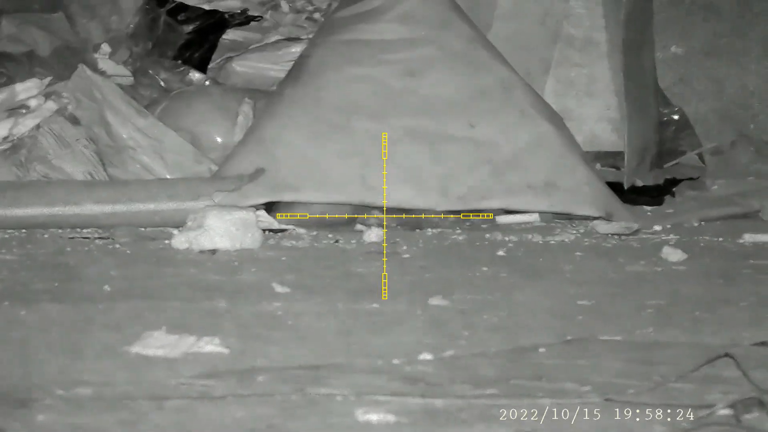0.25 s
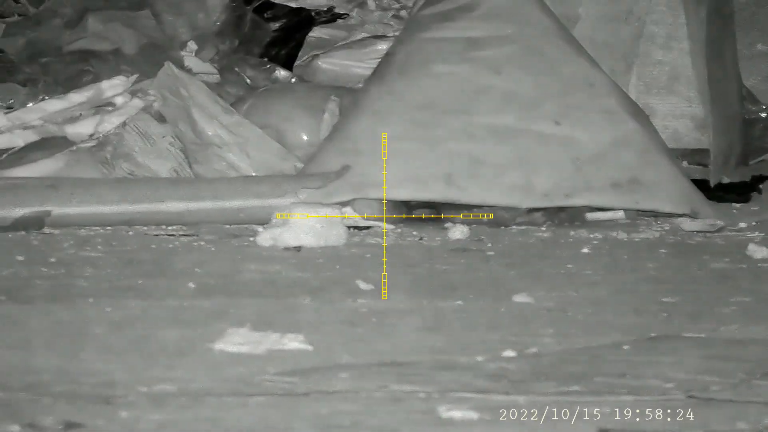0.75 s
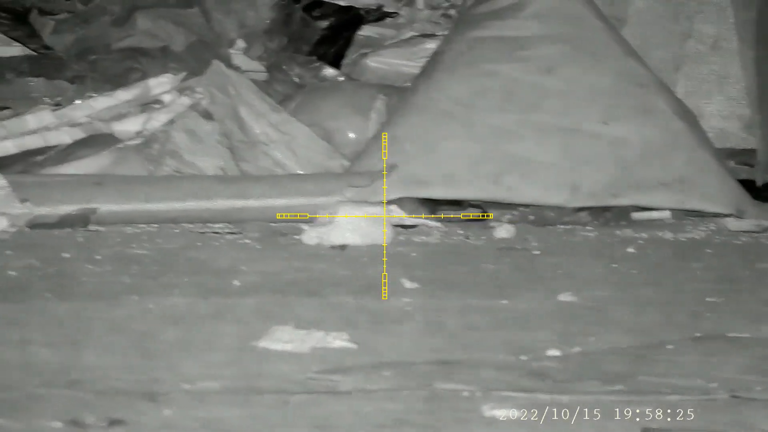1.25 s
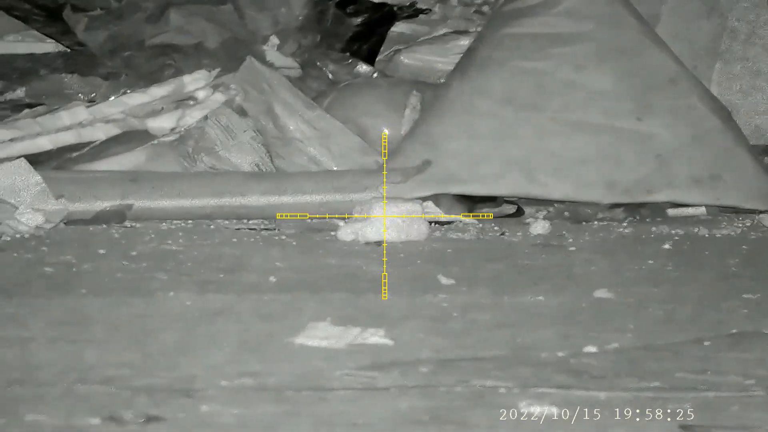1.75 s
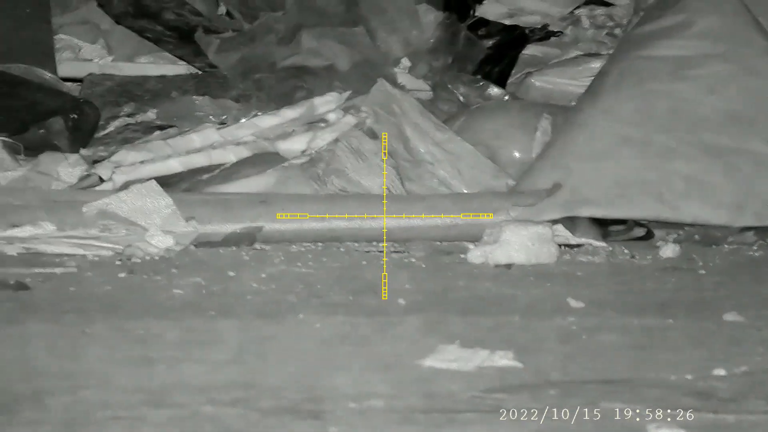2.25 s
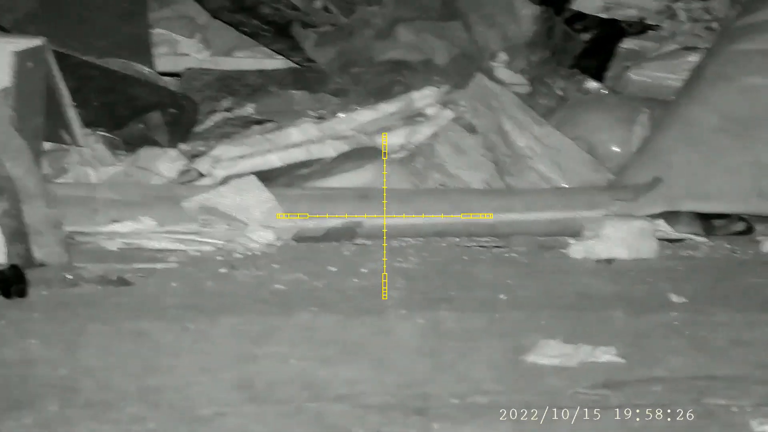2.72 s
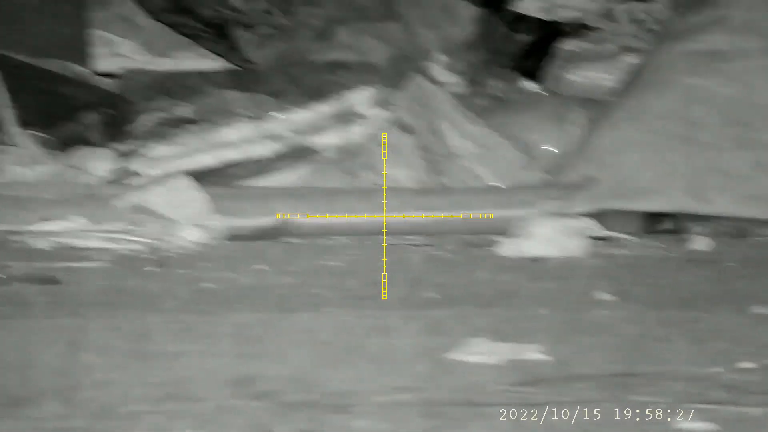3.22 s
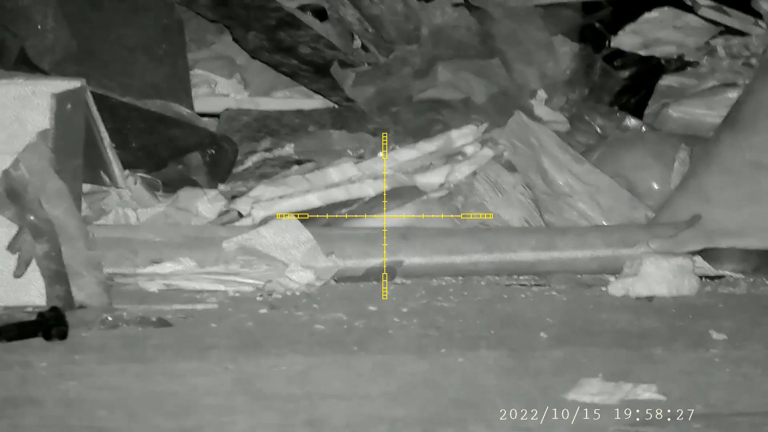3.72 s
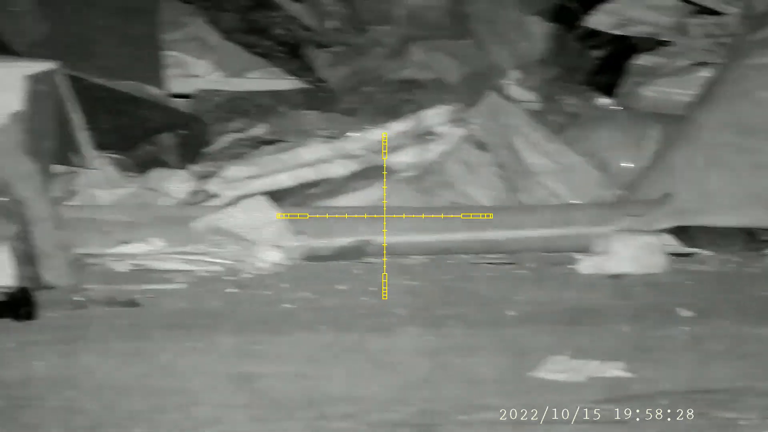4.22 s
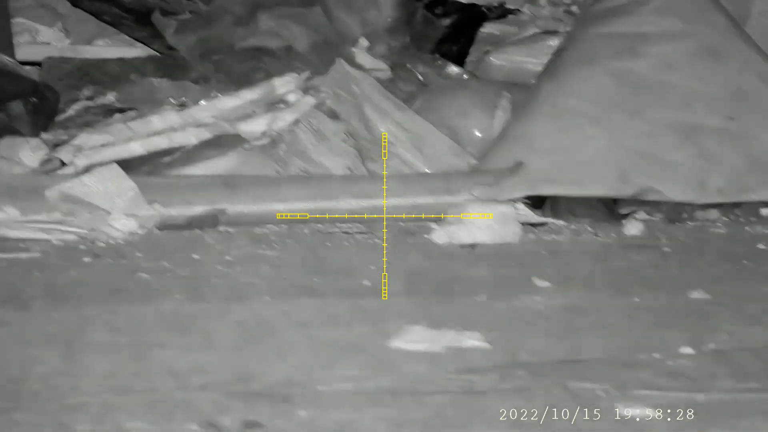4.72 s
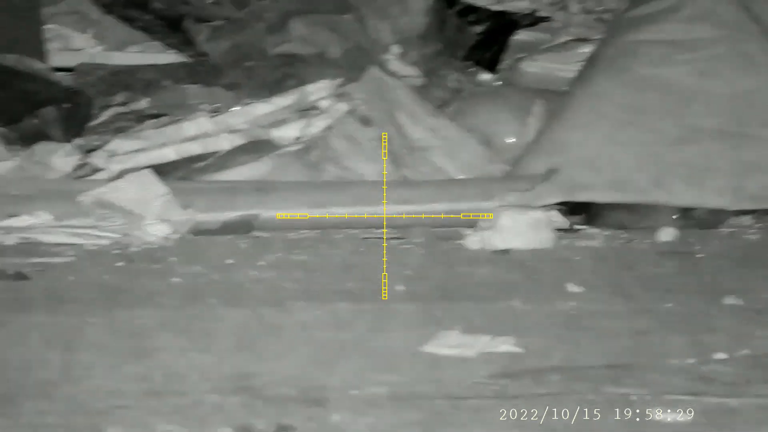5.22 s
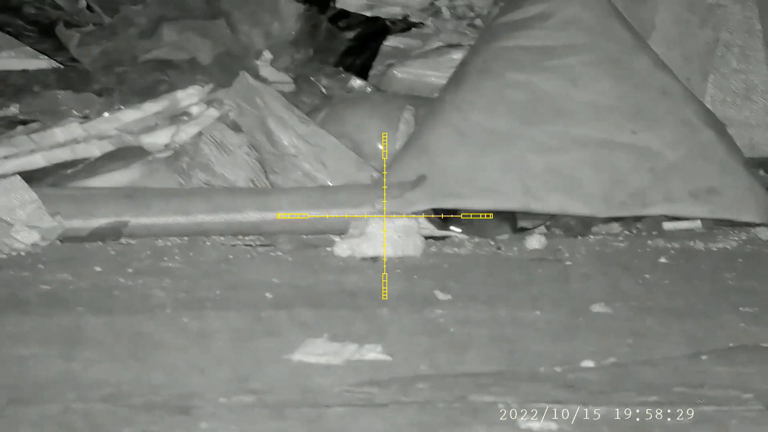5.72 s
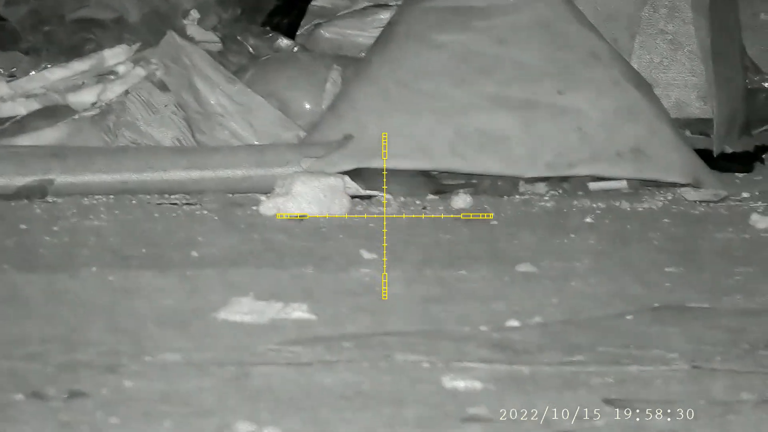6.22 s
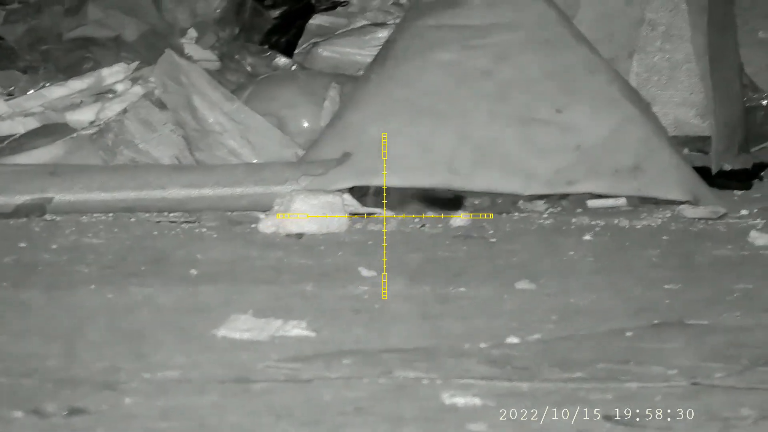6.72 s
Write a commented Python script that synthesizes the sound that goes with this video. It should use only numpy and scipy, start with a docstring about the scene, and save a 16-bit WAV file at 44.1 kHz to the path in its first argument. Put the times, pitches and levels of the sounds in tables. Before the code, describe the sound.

An air rifle cracks and thumps at once with a metallic spring ring, then hands work its action in hard steel clacks and clicks.

```python
"""In a yard, heard from a night scope on an air rifle: the rifle fires, then its action is worked by hand.
Shot: chattering steel contacts and a noise blast for piston and air, decaying sines for the ringing spring.
Handling: filtered contact bursts, ringing breech modes, pressure pulses on the stock, rubbing noise.
The yard answers with soft noise tails; the scope adds hiss, fizz and whine.
The scope's limiter ducks under the shot and recovers; overload clips, and the band is cut at the top."""
import sys
import numpy as np
from scipy.fft import rfft, irfft, next_fast_len
from scipy.io import wavfile
from scipy.ndimage import uniform_filter1d, minimum_filter1d

SR = 44100
rng = np.random.default_rng(int(sys.argv[2]) if len(sys.argv) > 2 else 0)


def to_wav(sig):
    """Store sig (one row per channel, or 1-D mono) as 16-bit WAV at the path in sys.argv[1].

    Samples outside -1..1 are clipped; the rate is SR.
    """
    pcm = np.clip(np.atleast_2d(sig), -1, 1) * 32767
    pcm = np.round(pcm).astype(np.int16)
    wavfile.write(sys.argv[1], SR, pcm.T)  # frames by channels


N = 306803
T = np.arange(N) / SR


def amp(db):
    """Decibels to gain."""
    return 10 ** (np.asarray(db) / 20)


def unit(x):
    """Scale to rms 1."""
    return x / np.sqrt(np.mean(x ** 2) + 1e-20)


def along(points, hz):
    """(Hz, value) points read on a log axis."""
    point_hz, value = np.transpose(points)
    return np.interp(np.log(hz + 1), np.log(point_hz), value)


def add(track, start_s, sound):
    """Mix a sound into the track; a start before zero becomes zero."""
    i = max(round(start_s * SR), 0)
    track[i:i + len(sound)] += sound[:N - i]


def filtered(x, gain):
    """x times a gain that depends on frequency."""
    size = next_fast_len(len(x) + 8192)
    spectrum = rfft(x, size) * gain(np.fft.rfftfreq(size, 1 / SR))
    return irfft(spectrum, size)[:len(x)]


def noise(gain):
    """Coloured noise of rms 1."""
    return unit(filtered(rng.standard_normal(N), gain))


def causal(gain):
    """Minimum-phase response with this magnitude: it rings only after the blow."""
    cepstrum = irfft(np.log(gain + 1e-6))
    half = len(cepstrum) // 2
    cepstrum[1:half] *= 2
    cepstrum[half + 1:] = 0
    return np.exp(rfft(cepstrum))


def peak(f, centre_hz, width_hz):
    """Power response of one resonance."""
    return 1 / (1 + (2 * (f - centre_hz) / width_hz) ** 2)


def grain(t, rate_hz, depth_db):
    """Gain that wanders at random between rate_hz new levels a second."""
    knots = rng.standard_normal(4096)
    return amp(depth_db * np.interp(t * rate_hz, np.arange(len(knots)), knots))


def swell(start_s, hold_s, rise_s, t60_s):
    """Envelope that rises to 1 at start_s, holds and dies away."""
    rise = np.exp(np.minimum(T - start_s, 0) / rise_s)
    return rise * amp(-60 * np.maximum(T - start_s - hold_s, 0) / t60_s)


# spectrum of the background air, relative: (point_hz, density_db)
AIR_SPECTRUM = [(20, -2), (60, 0), (250, -0.5), (500, -4), (1000, -8.5), (2000, -14.5), (3200, -19),
                (8700, -21), (12500, -23), (15300, -27), (15700, -52.5)]
# electronic whine: (harmonic_number, rms_db)
WHINE_LINES = [(2, -78), (3, -76), (4, -73.5), (5, -76.5), (6, -76.5), (7, -71), (8, -84), (9, -87),
               (10, -69.5), (12, -89), (13, -88.5), (14, -89.5)]
# narrow bands of electronic fizz, relative: (centre_hz, width_hz, gain_db)
FIZZ_BANDS = [(9480, 260, -5), (10330, 300, -5)]
HISS_DB = -58  # rms, fizz included


def electronics(whine_hz=1001):
    """Steady hiss, two bands of fizz and a comb of thin whining lines."""
    whine = 0
    for harmonic, rms_db in WHINE_LINES:
        phase = 2 * np.pi * (round(harmonic) * whine_hz * T + rng.random())
        whine = whine + amp(rms_db) * np.sqrt(2) * np.sin(phase)

    def colour(f):
        fizz = sum(amp(db) * np.exp(-2 * ((f - hz) / width_hz) ** 2) for hz, width_hz, db in FIZZ_BANDS)
        return np.hypot(amp(along(AIR_SPECTRUM, f)), fizz)

    return whine + amp(HISS_DB) * noise(colour)


# yard's answers to the loudest blows: (start_s, level_db)
YARD_ECHOES = [(0, -47.5), (2.37, -55), (4.449, -51.5)]
ECHO_RISE_S, ECHO_T60_S = 0.049, 1.9


def yard(hold_s=0.035):
    """Diffuse reflections: a soft, dull noise wash for the loudest blows."""
    tilt = [(100, -3), (350, -1), (1500, -1.5), (5000, -1.5), (12000, -4.5)]  # (Hz, dB)
    wash = noise(lambda f: amp(along(AIR_SPECTRUM, f) + along(tilt, f)))
    return wash * sum(amp(db) * swell(s, hold_s, ECHO_RISE_S, ECHO_T60_S) for s, db in YARD_ECHOES)


# resonances of action and scope mount, relative: (centre_hz, width_hz, gain_db)
BODY_RESONANCES = [(204, 32, -9.5), (474, 90, -18), (1060, 120, -11), (1422, 160, -6.5), (1994, 160, -2),
                   (2640, 150, -12.5), (3007, 130, -4), (3560, 170, -3.5), (4140, 160, 2), (4745, 130, -17),
                   (5390, 86, -8.5), (6300, 200, -2.5), (6930, 1000, -13), (8670, 710, -11.5)]


def body(f, between_db=-23):
    """Gain from the action through the mount to the microphone: resonances over a floor."""
    power = sum(amp(db) ** 2 * peak(f, hz, width_hz) for hz, width_hz, db in BODY_RESONANCES)
    return np.sqrt(power + amp(between_db) ** 2)


# hands and parts slide: (start_s, length_s, level_db)
SLIDE_STROKES = [(1.92, 0.038, -61.5), (2.32, .06, -42), (2.545, .1, -53), (3.22, 0.083, -50),
                 (3.55, .05, -61.5), (3.9, .06, -55.5), (4.39, .04, -47), (4.52, 0.1265, -55.5)]
# faint thin squeaks: (start_s, length_s, level_db)
THIN_SQUEAKS = [(0.47, 0.039, -53), (3.115, 0.035, -63), (3.708, 0.07, -57), (4.865, 0.12, -55.5),
                (5.346, 0.042, -62), (6.06, 0.1, -62), (6.555, 0.055, -62.5)]
STROKE_RISE_S, STROKE_T60_S = 0.029, 0.4
GRIP_FROM_S, GRIP_TO_S, GRIP_DB = 2, 5.0, -67.5  # the hands rub faintly while they work the gun


def sliding(squeak_hz=4065, squeak_width_hz=87):
    """Uneven rubbing noise sounds through the action in strokes; squeaks are a narrow noise band."""
    tilt = [(300, 5), (2000, 0), (4000, -10), (9000, -6)]  # (Hz, dB)
    rub = noise(lambda f: body(f) * amp(along(tilt, f)))
    strokes = [*SLIDE_STROKES, (GRIP_FROM_S, GRIP_TO_S - GRIP_FROM_S, GRIP_DB)]
    power = sum((amp(db) * swell(s, length_s, STROKE_RISE_S, STROKE_T60_S)) ** 2
                for s, length_s, db in strokes)
    out = np.sqrt(power) * unit(rub * grain(T, rate_hz=200, depth_db=2.0))
    tone = noise(lambda f: peak(f, squeak_hz, squeak_width_hz))
    for start_s, length_s, db in THIN_SQUEAKS:
        arch = np.sin(np.pi * np.clip((T - start_s) / length_s, 0, 1))
        out += amp(db) * tone * np.sqrt(np.abs(arch))
    return out


# the stock is pushed and lets go: (release_s, peak_db, build_s)
STOCK_BUMPS = [(.010, 14, 0.0032), (.043, 1, 0.0042), (.079, -12, .0051), (0.199, -32.5, 0.0054),
               (1.928, -24, .0011), (2.205, -22.5, 0.0032), (2.221, -17.5, 0.0021), (2.261, -22, 0.0055),
               (2.277, -20.5, 0.0033), (2.378, -17, 0.0033), (2.413, -14.5, 0.0022), (2.574, -23, .0071),
               (3.252, -20.5, .0043), (3.374, -34.5, 0.0047), (3.711, -33.5, .005), (3.909, -16.5, 0.0017),
               (4.052, -37, 0.0056), (4.384, -17, 0.0019), (4.426, -17, 0.0021), (4.521, -26.5, 0.0068),
               (4.616, -28, 0.0049), (4.687, -31, 0.0088), (4.89, -25, 0.0058)]
# the whole gun shakes in the hands: (start_s, start_level_db, pitch_hz, length_s, t60_s)
GUN_SHAKES = [(0, 9.5, 30.3, 0.097, 0.61), (0.083, -7.5, 42.6, 0.099, 0.24), (0.14, -14.5, 37.1, 0.056, .8),
              (4.388, -10, 46.3, .09, .14), (4.473, -19, 30, 0.054, 2), (4.531, -32.5, 28, .17, 1.2)]
# a heavy bump rebounds once, less after a slow build-up
REBOUND_S, REBOUND_DB, REBOUND_LOSS_DB_PER_S, HEAVY_BUMP_DB = .013, -4.5, 1201, -17


def stock(snap_s=0.00076, lead_s=0.036):
    """Pressure builds on the stock, flips as it lets go and rebounds; big jolts leave the gun shaking."""
    out = np.zeros(N)
    t = np.arange(-round(lead_s * SR), round(lead_s * SR)) / SR
    rebounds = [(s + REBOUND_S, db + REBOUND_DB - REBOUND_LOSS_DB_PER_S * build_s, build_s)
                for s, db, build_s in STOCK_BUMPS if db > HEAVY_BUMP_DB]
    for release_s, peak_db, build_s in list(STOCK_BUMPS) + rebounds:
        u = t / build_s
        before = (1 - (u / 2) ** 2) * np.exp(-(u / 2) ** 2)
        after = np.exp(-np.abs(u) * 0.63)
        push = -np.tanh(t / snap_s) * np.where(t < 0, before, after)
        push = push[max(round((lead_s - release_s) * SR), 0):]  # trim what precedes time zero
        add(out, release_s - lead_s, amp(peak_db) * push / np.abs(push).max())
    for start_s, db, pitch_hz, length_s, t60_s in GUN_SHAKES:
        age = T[:round(length_s * SR)]
        grip = 1 - (age / length_s) ** 6
        envelope = amp(db - 60 * age / t60_s) * grip ** 2 * np.minimum(age / 0.0031, 1)
        add(out, start_s, envelope * np.sin(2 * np.pi * pitch_hz * age))
    return out


FAVOUR_DB, FAVOUR_OCTAVES = 6, 0.35  # lift around a contact's strongest ring
DULLING = .25  # dB more knock and clack per dB lighter contact


def contacts(rows, release_s, rattle_db, rattle_t60_s, knock_db, clack_db, attack_s=0.00039, size=8192):
    """Steel parts chatter for milliseconds and drive the action; one ring is favoured, light hits are duller.

    rows: (start_s, level_db, contact_s, ring_hz, ping_db, sizzle_db)"""
    out = np.zeros(N)
    t, f = np.arange(size) / SR, np.fft.rfftfreq(size, 1 / SR)
    body_gain = body(f)
    for start_s, db, contact_s, ring_hz, ping_db, sizzle_db in rows:
        press = np.minimum(t / attack_s, 1) * amp(-60 * np.maximum(t - contact_s, 0) / release_s)
        rattle = amp(rattle_db - 60 * t / rattle_t60_s) * grain(t, rate_hz=400, depth_db=3.5)
        force = rfft(rng.standard_normal(size) * (press + rattle))
        # even out the random force, so each hit keeps its set colour
        force /= causal(np.sqrt(np.abs(uniform_filter1d(np.abs(force) ** 2, size=100))))
        knock = knock_db - DULLING * db
        clack = clack_db - DULLING * db
        colour = [(60, knock - 20), (220, knock), (500, knock + 3), (800, knock),
                  (1100, clack), (2400, clack), (3000, 0.0016), (4700, 0),
                  (5400, ping_db), (8400, ping_db),
                  (9100, sizzle_db), (13000, sizzle_db), (16000, sizzle_db - 14)]  # (Hz, dB)
        favour_db = FAVOUR_DB * np.exp(-(np.log2((f + 1) / ring_hz) / FAVOUR_OCTAVES) ** 2)
        ring = np.sqrt(1 + 3 * peak(f, ring_hz, 160))
        gain = body_gain * amp(along(colour, f) + favour_db) * ring
        hit = irfft(force * causal(gain))
        add(out, start_s, amp(db) * hit * np.sqrt((contact_s + 0.0018) * SR / np.sum(hit ** 2)))
    return out


LOOSE_DB, LOOSE_CONTACT_S, LOOSE_HZ = -26.5, .004, 1990  # level relative to the bump
LOOSE_PING_DB, LOOSE_SIZZLE_DB = -2, -4.5


def loose_part():
    """Every listed bump on the stock shakes a dull tick out of the action."""
    ticks = [(s, db + LOOSE_DB, LOOSE_CONTACT_S, LOOSE_HZ, LOOSE_PING_DB, LOOSE_SIZZLE_DB)
             for s, db, build_s in STOCK_BUMPS]
    return contacts(ticks, release_s=.014, rattle_db=-19.5, rattle_t60_s=.08, knock_db=1, clack_db=-7)


# contacts in the action: (start_s, level_db, contact_s, ring_hz, ping_db, sizzle_db)
ACTION_CONTACTS = [(0.4952, -38, 0.0019, 6780, 4.5, -26), (0.648, -34.5, 0.0056, 4250, -0.5, -34),
                   (1.7492, -36, 0.0019, 1415, -9.5, -39.5), (1.9191, -19.5, 0.001, 6300, -2, -6.5),
                   (2.1792, -12.5, 0.0013, 4150, 7, -25.5), (2.188, -27.5, 0.0028, 3850, -4, -20),
                   (2.2043, 0.5, 0.0054, 2200, 3.5, -6.5), (2.302, -12.5, 0.0037, 2150, 0, -18.5),
                   (2.313, -22, 0.0039, 1460, 3, -28), (2.3255, -24, 0.0026, 1980, 4, -35),
                   (2.3577, -14, 0.003, 5950, 1, -14), (2.3662, -4.5, 0.0065, 3570, 2.5, -16),
                   (2.406, 1.5, 0.0029, 1464, -1.5, -24), (2.547, -31.5, 0.0014, 2200, 11, -5),
                   (2.5648, -16.5, 0.0035, 2030, -5.5, -20), (2.603, -29.5, 0.0029, 1895, -9, -7),
                   (2.641, -41, 0.0028, 1450, -8, 3), (2.6818, -30, 0.0022, 1420, -5.5, -31),
                   (3.227, -24.5, .0046, 2030, 6, -30), (3.237, -18.5, .0033, 4350, 2, -35),
                   (3.249, -25.5, 0.005, 2170, -3, -38), (3.2625, -16, 0.0023, 2160, 1.5, -8),
                   (3.3177, -28, 0.0012, 1984, 2.5, 5.5), (3.693, -44, 0.0019, 1965, 3, -9),
                   (3.8976, -24.5, 0.0055, 6860, 2.5, -19.5), (3.904, -21.5, 0.0085, 1850, -5, -6.5),
                   (4.3685, -15.5, .002, 6190, -0.5, -24), (4.375, -9, 0.0031, 7070, 2, -17.5),
                   (4.3789, -6.5, 0.0054, 4140, 0, -9), (4.5218, -45, .003, 1950, -6, 3),
                   (4.548, -20, 0.0015, 6000, 4, -29), (4.943, -48.5, 0.028, 1890, -10, -9)]
# short modes of breech and lever, relative: (pitch_hz, level_db, t60_s)
BREECH_MODES = [(1445, -2, .14), (2194, -2, .12), (2545, -7, .12), (2947, -5, .12), (3558, 2, .2),
                (4541, -8, .14), (5214, -3, .14), (5643, -3, .14), (6280, -2, .2), (8659, -10, .12),
                (9004, -9, .15), (9335, -8, .12)]
# lever hits a stop, breech rings until a hand damps it; level relative: (start_s, level_db, ring_hz, free_s)
LEVER_STOPS = [(2.2044, -35, 2545, 0.038), (2.3665, -39, 3520, 0.039), (2.406, -37, 5214, 0.093),
               (2.531, -57, 4541, 0.02), (4.3788, -39.5, 6310, 0.12)]
LEAD_IN_S, LEAD_IN_DB, HEAVY_CLICK_DB = .004, -21, -12  # a faint lead-in tick before a heavy contact


def action(favour_db=10, damped_t60_s=.1, spread_db=4.06):
    """Steel contacts snap; hard stops ring the breech modes, each at random strength, until damped."""
    lead_ins = [(s - LEAD_IN_S, db + LEAD_IN_DB, *colour)
                for s, db, *colour in ACTION_CONTACTS if db > HEAVY_CLICK_DB]
    out = contacts([*ACTION_CONTACTS, *lead_ins], release_s=0.014, rattle_db=-18.0, rattle_t60_s=0.077,
                   knock_db=-4.0, clack_db=-1.5)
    t = T[:SR // 2]
    for start_s, db, ring_hz, free_s in LEVER_STOPS:
        hand = amp(-60 * np.maximum(t - free_s, 0) / damped_t60_s)
        for hz, mode_db, t60_s in BREECH_MODES:
            strength_db = db + mode_db + favour_db * peak(hz, ring_hz, 400) + rng.normal(0, spread_db)
            add(out, start_s, hand * amp(strength_db - 60 * t / t60_s) * np.sin(2 * np.pi * hz * t))
    return out


# piston slam and rebounds: (start_s, level_db, contact_s, ring_hz, ping_db, sizzle_db)
PISTON_BLOWS = [(0, 25.5, .0076, 3960, 4, 3), (.0144, 27, .0047, 4060, -3.5, 11.5),
                (.02, 24, .0005, 4080, 5, 7.5), (.03, 19.5, .0017, 4330, 5, 11),
                (.0375, 13.5, .0029, 3944, 4, 10.5)]
# long modes of spring and barrel, relative: (pitch_hz, level_db, t60_s)
SPRING_MODES = [(215, -24, .4), (318, -37, 1.0), (1187, -21, .4), (1841, -20, 1.05), (2700, -32, .4),
                (3563, 0, .3), (5125, -10, .35), (6282, -17, .42), (6985, -23, .4), (8479, -22, .35),
                (9577, -16, .35)]


def shot(ring_db=-8, blast_db=3, blast_t60_s=.17, echo_db=-32, echo_t60_s=0.68):
    """The piston slams and rebounds, air rushes from the muzzle, the spring rings on, the yard answers dully."""
    rush_colour = [(200, -4), (600, -1.0), (1400, 3.5), (2900, -4.0),
                   (4000, -6.0), (8000, 0), (12000, 3.5), (16000, -11.5)]  # (Hz, dB)
    rush = noise(lambda f: body(f, between_db=-9.5) * amp(along(rush_colour, f)))
    blast = rush * amp(blast_db - 60 * T / blast_t60_s) * grain(T, rate_hz=110, depth_db=5.5)
    slam = contacts(PISTON_BLOWS, release_s=.012, rattle_db=-16.5, rattle_t60_s=0.09,
                    knock_db=6.5, clack_db=8)
    spent = np.interp(T, [.066, .083], [1, 0])  # piston comes to rest, air runs out
    echo_colour = [(60, 8.5), (200, 0), (600, -7.0), (3000, -10.5), (11000, -14), (16000, -29.5)]  # (Hz, dB)
    echo = noise(lambda f: amp(along(echo_colour, f))) * amp(echo_db - 60 * T / echo_t60_s)
    spring = sum(amp(db - 60 * T / t60_s) * np.sin(2 * np.pi * hz * T) for hz, db, t60_s in SPRING_MODES)
    return (slam + blast) * spent + echo + amp(ring_db) * spring


def scene():
    """Sum of all sources as one channel, ahead of the scope's limiter."""
    background = electronics() + yard()
    handling = sliding() + stock() + loose_part() + action()
    return (background + handling + shot())[None]


def limiter(x, ceiling_db, recover_db_per_s, size=44):
    """Gain drops within about a millisecond around a peak and climbs back at a steady dB rate."""
    peaks = -minimum_filter1d(-np.abs(x), size)
    over_db = np.maximum(20 * np.log10(peaks + 1e-9) - ceiling_db, 0)
    recovery_db = recover_db_per_s * T
    cut_db = np.maximum.accumulate(over_db + recovery_db) - recovery_db
    return x * amp(-uniform_filter1d(cut_db, size))


TOP_HZ = 15850


def record(dry):
    """Limiter, overload and band limit of the scope."""
    limited = limiter(dry[0], ceiling_db=2.0, recover_db_per_s=151)
    overloaded = np.clip(limited, -1, 1)
    return filtered(overloaded, lambda f: f < TOP_HZ)[None]


dry = scene()
out = record(dry)
to_wav(out)
```